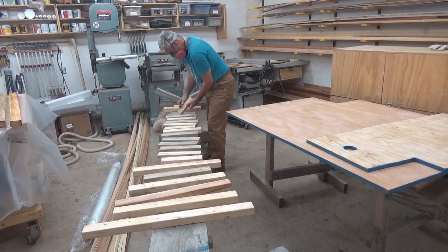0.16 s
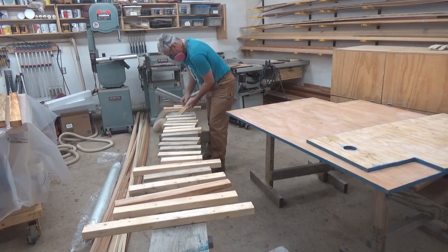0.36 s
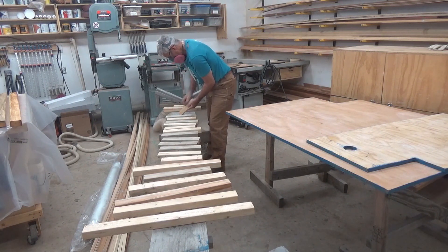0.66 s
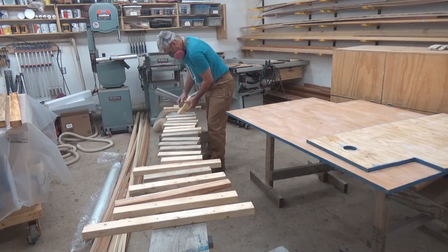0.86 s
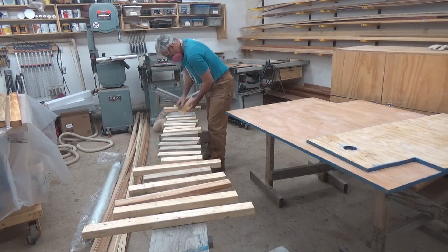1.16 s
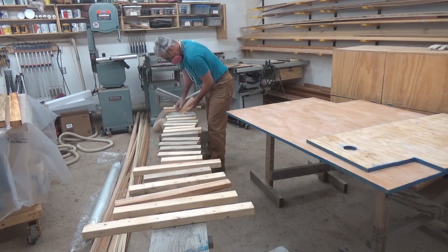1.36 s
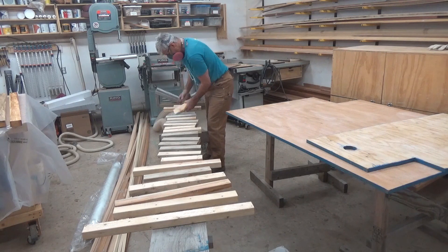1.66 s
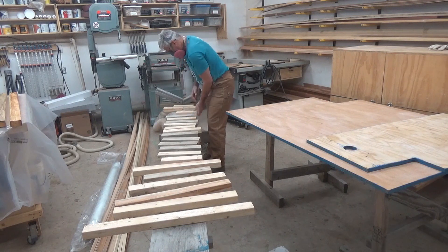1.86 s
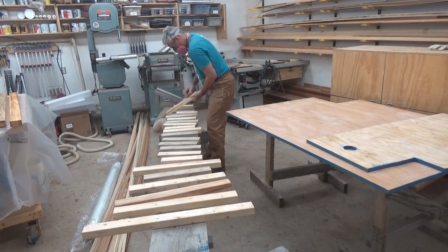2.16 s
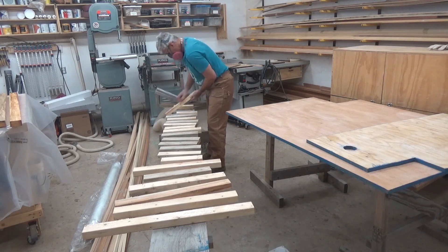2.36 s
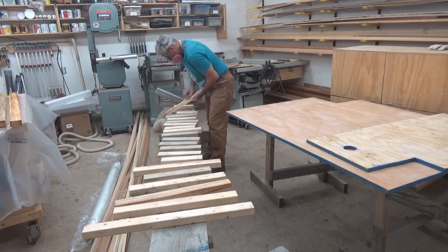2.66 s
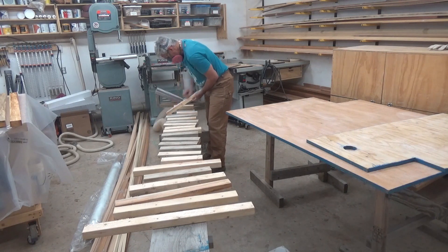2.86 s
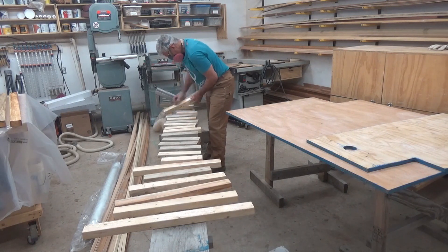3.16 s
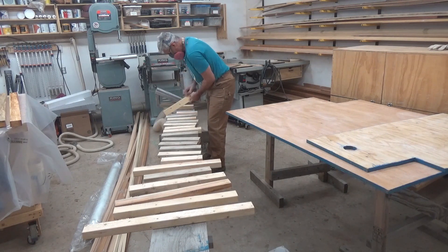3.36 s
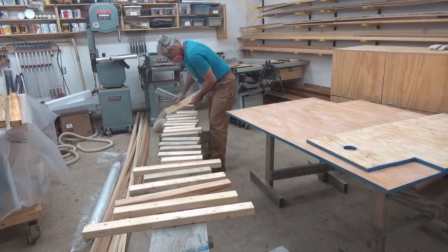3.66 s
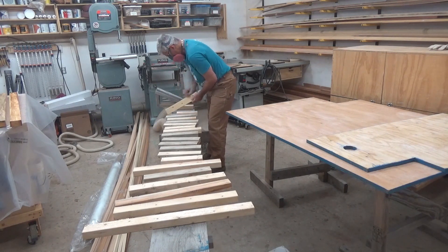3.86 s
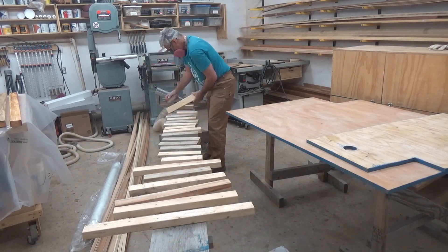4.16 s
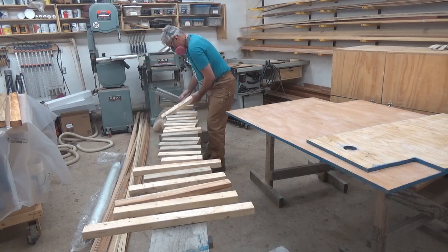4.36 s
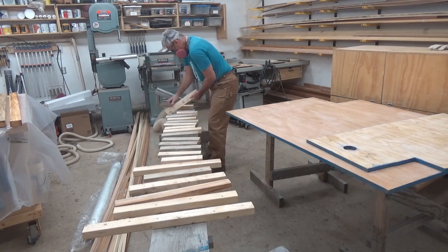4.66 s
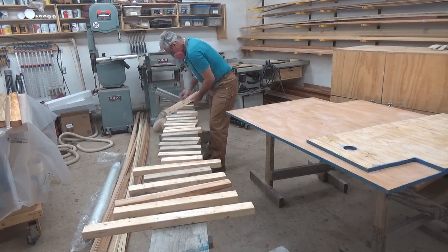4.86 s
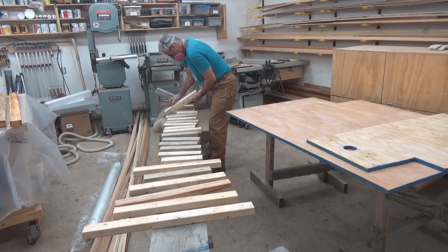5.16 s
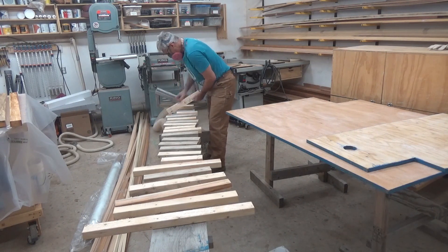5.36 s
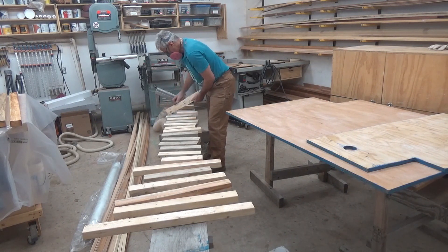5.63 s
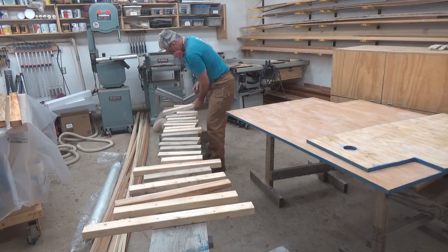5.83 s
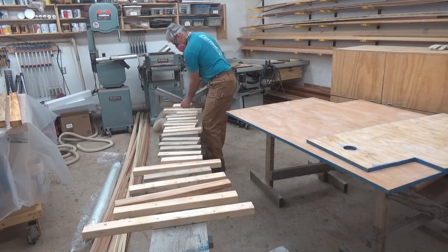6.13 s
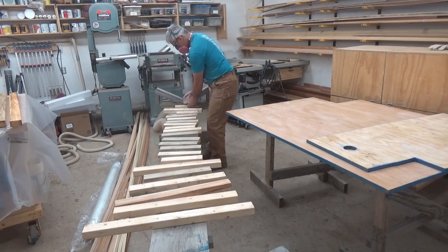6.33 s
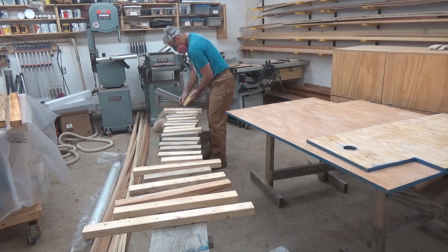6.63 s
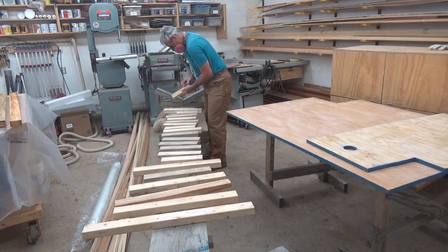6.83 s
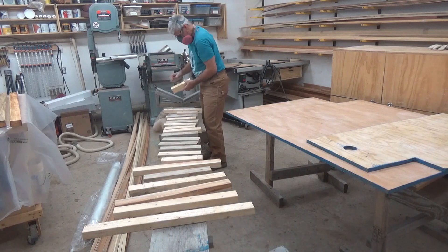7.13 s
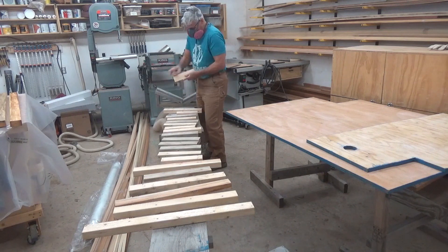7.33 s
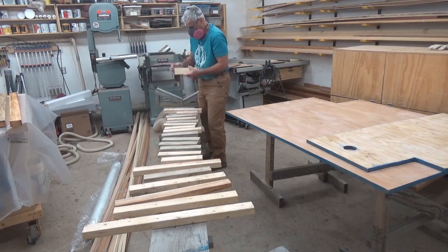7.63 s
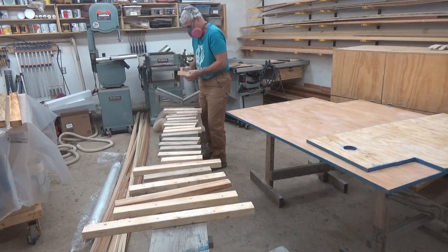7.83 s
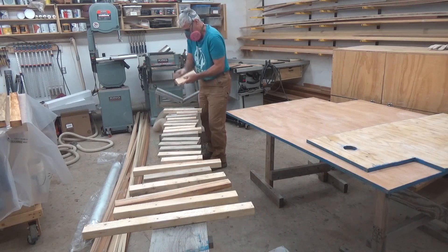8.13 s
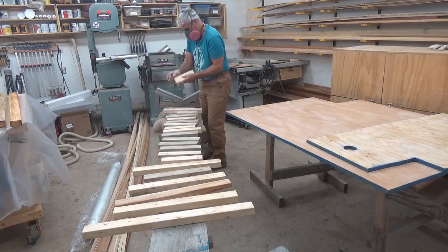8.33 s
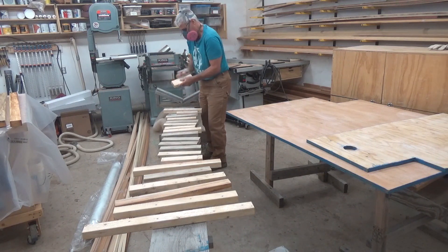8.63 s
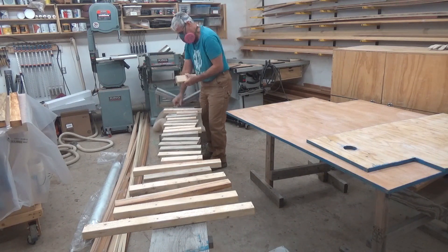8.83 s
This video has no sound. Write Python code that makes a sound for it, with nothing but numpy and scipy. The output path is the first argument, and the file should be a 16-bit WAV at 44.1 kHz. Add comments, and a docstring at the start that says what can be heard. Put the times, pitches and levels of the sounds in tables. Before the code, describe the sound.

A short rasp of sandpaper on wood opens the sound and stops by 0.3 seconds. From about 0.8 seconds a wooden slat knocks against other slats, with the loudest cluster of clacks near 1.2 seconds and another knock at 1.7, each jolting the workbench into a soft thud. Faint taps and slides follow. At about 2.4 seconds hand sanding begins, a gritty, hissing rasp moving back and forth roughly twice a second. It breaks off around 6 seconds with a light bump. From 6.4 seconds the strokes resume, now with short, sharp catches as the paper snags on the edge and the slat rings faintly beneath it, easing slightly near 9 seconds. Everything is heard from a few metres away in a workshop with a short reverberation, over a steady low rush and hum of ventilation.

```python
"""Hand-sanding wooden slats

Grit rasps over the wood in quick strokes and snags on an edge, a few metres away in a workshop.
Between spells a slat is set down, clacks against the row and jolts the bench; the next is picked up.
The room rings on over a low ventilation noise."""
import sys
import numpy as np
from scipy import signal
from scipy.fft import rfft, irfft, next_fast_len
from scipy.io import wavfile
from scipy.ndimage import uniform_filter1d, minimum_filter1d

SR = 44100
rng = np.random.default_rng(int(sys.argv[2]) if len(sys.argv) > 2 else 0)


def to_wav(sig):
    """Store sig (one row per channel, or 1-D mono) as 16-bit WAV at the path in sys.argv[1].

    Samples outside -1..1 are clipped; the rate is SR.
    """
    pcm = np.clip(np.atleast_2d(sig), -1, 1) * 32767
    pcm = np.round(pcm).astype(np.int16)
    wavfile.write(sys.argv[1], SR, pcm.T)  # frames by channels


N = 396459
TIME = np.arange(N) / SR


# to-and-fro of the hand: (turn [s], pull length [s], pull level [dB], push length [s], push level [dB])
HAND_STROKES = [(-0.045, 0.26, -18.7, 0.26, -17), (2.566, 0.2, -27, 0.28, -16),
                (3.111, 0.24, -15.3, 0.22, -11.5), (3.57, 0.22, -18.5, 0.24, -15.5),
                (4.031, 0.28, -20, 0.21, -13), (4.443, 0.25, -21, 0.2, -16.0),
                (4.87, 0.27, -19.5, 0.25, -16), (5.294, 0.23, -18, 0.25, -14.5),
                (5.755, 0.27, -19, 0.23, -19.5), (6.643, 0.22, -15.5, 0.28, -13.5),
                (7.119, 0.24, -16.5, 0.25, -12.5), (7.57, 0.25, -15.5, 0.27, -14),
                (8.017, 0.25, -15, 0.28, -15), (8.468, 0.25, -20, 0.26, -15), (8.946, 0.29, -23, 0.25, -25)]
# faint slides between spells: (start [s], length [s], level [dB])
FAINT_SLIDES = [(1.66, 0.21, -55.5), (1.834, 0.15, -54.5), (2.014, 0.23, -57.5), (5.92, .16, -44),
                (6.112, 0.033, -41), (6.316, 0.13, -52)]

def rubs(overlap_s=0.026, rest_s=0.7, fresh_db=4, easing_s=0.47):
    """Yield (start [s], end [s], fastest point [0-1], level [dB], extra bite [dB]) for each rub."""
    spell_s, last_turn_s = -np.inf, HAND_STROKES[0][0]
    for turn_s, pull_s, pull_db, push_s, push_db in HAND_STROKES:
        if turn_s - last_turn_s > rest_s:
            spell_s = turn_s - pull_s
        last_turn_s = turn_s
        pull = (turn_s - pull_s, turn_s + overlap_s, pull_db)
        push = (turn_s - overlap_s, turn_s + push_s, push_db)
        for start_s, end_s, db in (pull, push):
            # fresh paper bites harder at the start of each spell, then eases
            yield start_s, end_s, 0.44, db, fresh_db * np.exp((spell_s - start_s) / easing_s)
    for start_s, length_s, db in FAINT_SLIDES:
        yield start_s, start_s + length_s, 0.46, db, 0


def stroke_gains(firm_db=-16.5, firm_bite_db=-7, bite_slope=0.26):
    """Hiss grows faster with hand speed than rasp; lighter strokes are coarser."""
    hiss, rasp = np.zeros((2, N))
    for start_s, end_s, fastest, db, extra_db in rubs():
        now = (TIME > start_s) & (TIME < end_s)
        progress = (TIME[now] - start_s) / (end_s - start_s)
        speed = np.sin(np.pi * np.interp(progress, [0, fastest, 1], [0, 0.5, 1]))
        bite_db = firm_bite_db + bite_slope * (firm_db - db) + extra_db
        hiss[now] = np.hypot(hiss[now], undb(db) * speed ** 1.4)
        rasp[now] = np.hypot(rasp[now], undb(db + bite_db) * speed ** 0.97)
    return hiss, rasp


def grit(spread_db, density):
    """Wood fibres fracture: dense clicks of uneven size."""
    hit = rng.random(N) < density
    size = np.minimum(rng.exponential(size=N), 4)
    return unit(hit * rng.standard_normal(N) * undb(spread_db * size))


# fine-grit hiss: (frequency [Hz], level [dB])
HISS_SPECTRUM = [(2000, -37.5), (3500, -33.5), (4300, -10.5), (5100, -6), (5700, -4.5), (6600, -6),
                 (7600, -6.5), (8800, -6), (9800, -4.5), (11000, -9.5)]
# coarse-grit rasp: (frequency [Hz], level [dB])
RASP_SPECTRUM = [(50, -21), (105, -9), (150, -21), (300, -12), (550, -11.5), (780, -16.5), (1250, -10),
                 (1700, -5.5), (2050, -6), (2900, -0.5), (3700, -1.5), (4700, -5), (5600, 0), (8000, -9)]
# hand-held slat: (frequency [Hz], width [Hz], level [dB])
HELD_RESONANCES = [(354, 100, -10), (463, 21, -6.5), (1005, 83, -4.5), (1803, 61, -2), (2280, 46, -1),
                   (3067, 95, 1), (3443, 300, 2.5), (4915, 77, 5.5)]
# slat ring relative to the rasp, freest in the air: (time [s], level [dB])
RING_ENVELOPE = [(0, -4.5), (2.6, -9), (3.5, -10.5), (5.6, -15), (6.5, -4.5), (7.3, -3), (8.9, -6)]
# slat singing under a light drag: (time [s], level [dB])
SONG_ENVELOPE = [(2.38, -62), (2.47, -32), (2.54, -49), (5.7, -53), (5.86, -49), (6.04, -46), (6.2, -60)]

def sanding():
    """Grit drags over the slat; the paper grips and slips, and the slat rings under it."""
    hiss_gain, rasp_gain = stroke_gains()
    grip = unit(undb(1.2 * walk(40) + 0.74 * walk(260)))
    hiss = unit(colour(grit(spread_db=0.65, density=0.37), HISS_SPECTRUM)) * undb(1.8 * walk(26))
    rasp = unit(colour(grit(spread_db=0.4, density=0.2), RASP_SPECTRUM)) * undb(2.27 + 1.65 * walk(30))
    scrape = grit(spread_db=3.5, density=0.2)
    slat = unit(sum(undb(db) * resonate(scrape, hz, width_hz) for hz, width_hz, db in HELD_RESONANCES))
    slat *= undb(np.interp(TIME, *np.transpose(RING_ENVELOPE)))
    song = unit(resonate(resonate(scrape, hz=1020, width_hz=100), hz=1023, width_hz=100))
    song_db = np.interp(TIME, *np.transpose(SONG_ENVELOPE), left=-120, right=-120)
    return grip * (hiss_gain * hiss + rasp_gain * (rasp + slat) + undb(song_db) * song)


def edge_snags(from_s=6.4, pitch_hz=4660, scatter=0.025):
    """The slat's edge catches the paper late in each pull and early in each push; rows as ROUGH_SPOTS."""
    for turn_s, _, pull_db, _, push_db in HAND_STROKES:
        if turn_s > from_s:
            pull_hz, push_hz = pitch_hz * (1 + scatter * rng.standard_normal(2))
            yield turn_s - 0.056, pull_db + 9, pull_hz, 0.021
            yield turn_s + 0.036, push_db + 6.2, push_hz, 0.014


# mid-stroke catches: (time [s], peak [dB], pitch [Hz], length [s])
ROUGH_SPOTS = [(3.046, -4, 4900, 0.0068), (6.518, -2, 3680, 0.04), (8.14, -4, 4940, .006),
               (8.325, -10, 4730, .009)]

def snags(width_hz=1300):
    """The paper catches and chatters briefly in a narrow band."""
    track = np.zeros(N)
    t = TIME[:SR // 20]
    for time_s, db, hz, length_s in [*ROUGH_SPOTS, *edge_snags()]:
        chatter = resonate(resonate(rng.standard_normal(len(t)), hz, width_hz), hz, width_hz)
        burst = chatter * np.sin(np.pi * np.minimum(t / length_s, 1))
        add(track, time_s, undb(db) * burst / np.abs(burst).max())
    return track


# slat lying on the row: (frequency [Hz], level [dB], t60 [s])
SLAT_MODES = [(268, -9.5, .13), (291.5, 9.5, 0.075), (336, 12.5, 0.042), (411, -1, 0.052),
              (486, -1.5, 0.19), (610, 4.5, 0.04), (696, 5, 0.023), (860, 2, 0.022), (970, -3.5, 0.053),
              (1090, -22, .04), (1150, -17, 0.034), (1440, -26, 0.038), (1900, -31, 0.04), (2320, -25, .04),
              (2880, -34, .04)]
# slat against the row: (time [s], peak [dB], hardness [Hz])
SLAT_KNOCKS = [(.787, -8, 259), (0.898, -22, 140), (1.050, -9, 417), (1.2004, 2.5, 1160),
               (1.216, -4.5, 1000), (1.259, -1, 1000), (1.33, -24, 600), (1.676, -8, 288),
               (1.923, -25, 202), (2.016, -25.5, 200), (2.123, -30, 198), (6.035, -20.5, 170)]

def knocks(rebound_s=0.027, rebound_db=-19, crack_db=-27, crack_s=0.016, tick_db=-44, detune=0.013):
    """A slat hits the row and rebounds once: modes, contact crack and a faint dry tick."""
    track = np.zeros(N)
    t = TIME[:SR // 3]
    for time_s, peak_db, hardness_hz in SLAT_KNOCKS:
        for contact_s, contact_db in ((time_s, peak_db), (time_s + rebound_s, peak_db + rebound_db)):
            # each contact holds the slat differently
            modes = [(hz * (1 + detune * rng.standard_normal()), db, t60) for hz, db, t60 in SLAT_MODES]
            crack = rng.standard_normal(len(t)) * np.exp(-t / crack_s)
            vibration = soften(ring(modes, t) + undb(crack_db) * crack, hardness_hz)
            clack = radiate(vibration, cutoff_hz=284)
            add(track, contact_s, undb(contact_db) * (clack / np.abs(clack).max() + undb(tick_db) * crack))
    return track


# drone, set by how firmly the slat rests on the row: (time [s], level [dB])
DRONE_ENVELOPE = [(0, -26.5), (.12, -29.5), (.25, -59), (.42, -60)]

def drone():
    """Rubbing drives the low modes of the slat while it lies on the row."""
    drive = grit(spread_db=3.5, density=0.07)
    vibration = signal.fftconvolve(drive, ring(SLAT_MODES, TIME[:SR // 3]))[:N]
    low = radiate(soften(vibration, hardness_hz=300), cutoff_hz=330)
    return unit(low) * undb(np.interp(TIME, *np.transpose(DRONE_ENVELOPE), right=-120))


# workbench: (frequency [Hz], level [dB], t60 [s])
BENCH_MODES = [(84, -25, 0.083), (106, 3, 0.073), (154.2, -0.5, 0.17), (205, -4.5, 0.14)]
# shifting weight: (time [s], peak [dB])
WEIGHT_BUMPS = [(1.537, -34), (1.61, -36), (1.768, -23), (1.901, -38), (4.221, -29), (5.062, -32.5),
                (5.935, -34.5), (7.801, -30)]

def bench_thuds(lag_s=0.025, jolt_db=-19.5, jolt_slope=0.48):
    """Knocks and shifting weight jolt the bench into a low thud."""
    track = np.zeros(N)
    thud = radiate(soften(ring(BENCH_MODES, TIME[:SR // 3]), hardness_hz=161), cutoff_hz=106)
    jolts = [(time_s + lag_s, jolt_db + jolt_slope * db) for time_s, db, _ in SLAT_KNOCKS]
    for time_s, db in [*jolts, *WEIGHT_BUMPS]:
        add(track, time_s, undb(db) * thud / np.abs(thud).max())
    return track


# reverberation: (frequency [Hz], t60 [s])
TAIL_DECAY = [(100, 0.54), (300, 0.57), (800, 0.68), (2000, 0.53), (5000, 0.5), (11000, 0.31)]

def diffuse_tail(build_s=0.0072):
    """Dense reflections of unit energy; treble dies first."""
    hz, time_s, cells = signal.stft(rng.standard_normal(SR), SR, nperseg=256)
    cells *= undb(-60 * time_s / on_log_axis(TAIL_DECAY, hz)[:, None])
    onset = 1 - np.exp(-(TIME[:SR] / build_s) ** 2)
    tail = signal.istft(cells, SR)[1][:SR] * onset
    return tail / np.sqrt(np.sum(tail ** 2))


# room modes: (frequency [Hz], level [dB], t60 [s])
STANDING_WAVES = [(148.3, -45.5, 0.96), (205.5, -47, 0.99), (255, -70, 0.71), (420, -80, 0.68),
                  (467, -83, .65), (572, -40.5, 0.99)]
# floor and bench echoes: (delay [s], gain [linear])
REFLECTIONS = [(.003, 0.63), (.0061, 0.73), (.0093, .25)]

def workshop(x, wet_db, echo_db, standing_db, side_db):
    """Direct sound, first reflections, standing waves and tail; only the tail has width."""
    near = undb(standing_db) * ring(STANDING_WAVES, TIME[:SR])
    near[0] += 1
    for delay_s, gain in REFLECTIONS:
        near[int(delay_s * SR)] += gain * undb(echo_db)
    # moving hands shift the reflection pattern
    weights = np.array([walk(5) for _ in range(4)])
    weights /= np.sqrt(np.sum(weights ** 2, axis=0))
    tail = sum(signal.fftconvolve(x * weight, diffuse_tail())[:N] for weight in weights)
    mid = signal.fftconvolve(x, near)[:N] + undb(wet_db) * tail
    side = undb(wet_db + side_db) * signal.fftconvolve(x, diffuse_tail())[:N]
    return np.array([mid + side, mid - side]) / np.sqrt(np.sum(near ** 2) + undb(2 * wet_db))


# air rush: (frequency [Hz], relative density [dB])
AIR_SPECTRUM = [(15, -65), (25, -26), (59, -5), (197, -7.5), (247, -3), (412, -8), (505, -5), (703, -12),
                (778, -16.5), (907, -11), (1260, -15), (2050, -23.5), (3970, -27), (4400, -27),
                (11000, -31), (14300, -77), (22000, -120)]
# ventilation hum: (frequency [Hz], level [dB])
HUM_LINES = [(75.4, -67.5), (247.6, -55), (764, -60.5), (797, -66), (4000, -89)]

def ventilation(air_db=-42.5, side_db=-17):
    """Steady low rush of air with wavering hum lines."""
    mid, side = (unit(colour(rng.standard_normal(N), AIR_SPECTRUM)) for _ in range(2))
    air = mid + undb(side_db) * np.array([side, -side])
    hum = np.zeros(N)
    for hz, db in HUM_LINES:
        amplitude = np.sqrt(2) * undb(db + 2 * walk(3.14))
        hum += amplitude * np.sin(2 * np.pi * hz * TIME + 1.33 * walk(6))
    return undb(air_db + 0.58 * walk(2.79)) * air + hum


def soften(x, hardness_hz):
    """A soft contact lasts longer and leaves the high modes quiet."""
    pole = np.exp(-2 * np.pi * hardness_hz / SR)
    return signal.lfilter([1 - pole], [1, -2 * pole, pole ** 2], x)


def radiate(x, cutoff_hz):
    """Air slips round narrow wood, so little bass radiates."""
    return signal.sosfilt(signal.butter(2, cutoff_hz, "high", fs=SR, output="sos"), x)


def resonate(x, hz, width_hz):
    """One resonance, unity gain at centre."""
    return signal.lfilter(*signal.iirpeak(hz, hz / width_hz, fs=SR), x)


def ring(modes, t):
    """Impulse response of decaying modes."""
    return sum(undb(db - 60 * t / t60) * np.cos(2 * np.pi * hz * t) for hz, db, t60 in modes)


def colour(x, spectrum):
    """Filter by (frequency [Hz], level [dB]) points."""
    size = next_fast_len(len(x) + 4096)
    hz = np.arange(size // 2 + 1) * SR / size
    return irfft(rfft(x, size) * undb(on_log_axis(spectrum, hz)), size)[:len(x)]


def on_log_axis(points, hz):
    """Interpolate over log frequency."""
    knots_hz, values = np.transpose(points)
    return np.interp(np.log(hz + 1e-9), np.log(knots_hz), values)


def walk(rate_hz):
    """Smooth random wander, rms 1."""
    knots = rng.standard_normal(N // 20)
    return unit(np.interp(TIME * rate_hz, np.arange(len(knots)), knots))


def add(track, time_s, sound):
    """Mix in a sound at time_s."""
    start = int(time_s * SR)
    track[start:start + len(sound)] += sound[:N - start]


def undb(db):
    """Decibels to gain."""
    return 10 ** (np.asarray(db) / 20)


def unit(x):
    """Scale to rms 1."""
    return x / np.sqrt(np.mean(x ** 2))


def limit(x, ceiling=0.75, hold_s=0.0034):
    """Duck the gain to hold peaks under the ceiling."""
    size = int(hold_s * SR) | 1
    gain = np.minimum(1, ceiling / (np.abs(x).max(axis=0) + 1e-9))
    return x * uniform_filter1d(minimum_filter1d(gain, size), size)


def scene():
    """Sanding and knocks share the room; the low knocks stir it more."""
    rubbing = workshop(sanding() + snags() + drone(), wet_db=-4, echo_db=-26, standing_db=-30.5,
                       side_db=-12.5)
    handling = workshop(knocks() + bench_thuds(), wet_db=5.5, echo_db=1.5, standing_db=-5.5, side_db=-20.5)
    return rubbing + undb(2.0) * handling + ventilation()


def record(dry, balance_db=0.7, cutoff_hz=11050):
    """Slight left bias, peak limiter, steep low-pass."""
    panned = dry * undb(np.array([[balance_db], [-balance_db]]) / 2)
    lowpass = signal.ellip(12, 0.05, 60, cutoff_hz, fs=SR, output="sos")
    return signal.sosfiltfilt(lowpass, limit(panned))


dry = scene()
out = record(dry)
to_wav(out)
```